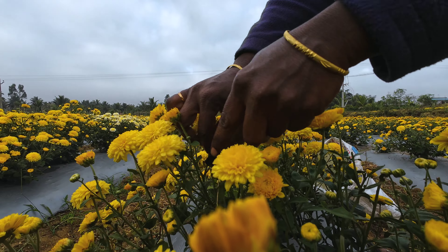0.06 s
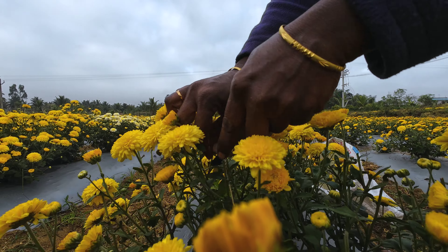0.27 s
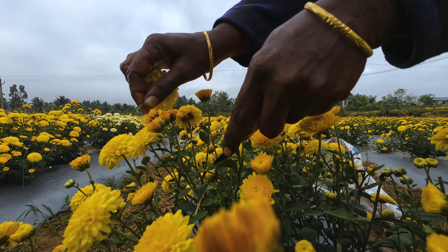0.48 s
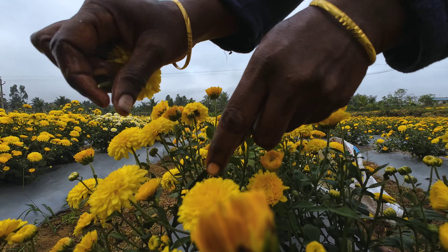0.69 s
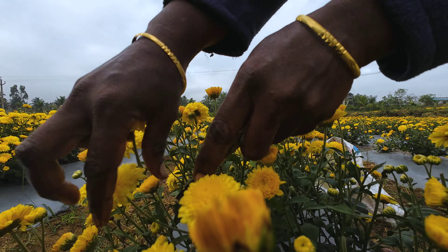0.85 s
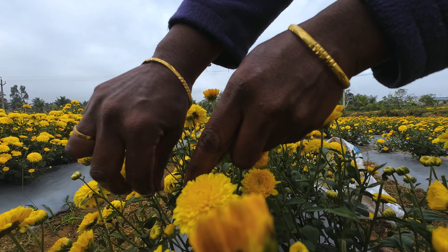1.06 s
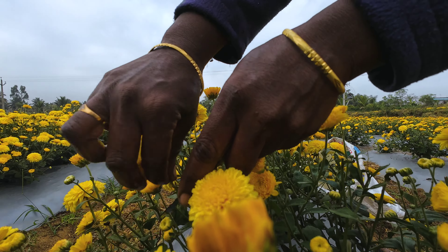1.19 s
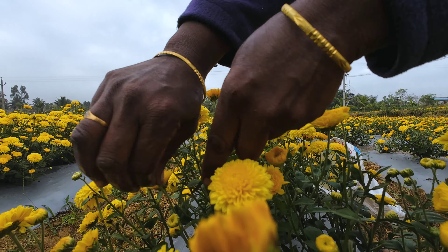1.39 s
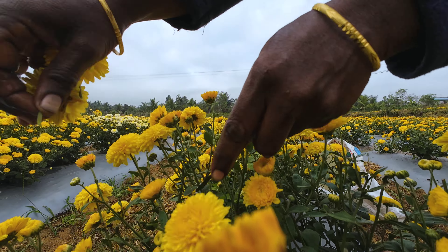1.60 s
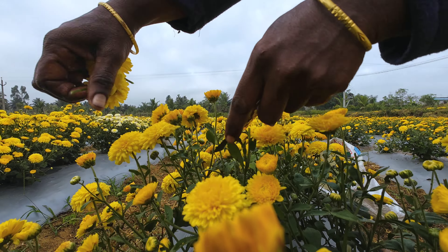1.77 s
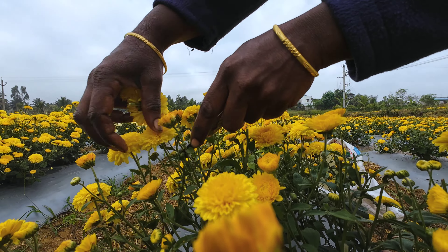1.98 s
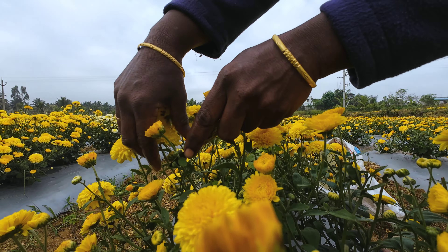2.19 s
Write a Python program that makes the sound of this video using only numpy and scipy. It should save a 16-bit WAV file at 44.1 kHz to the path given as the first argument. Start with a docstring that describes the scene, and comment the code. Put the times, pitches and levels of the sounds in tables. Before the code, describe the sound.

Two flower stems snap crisply about a second apart as hands pick them close to the microphone. Leaves rustle and tick between the snaps, over low wind rumble and a few faint bird chirps in an open field.

```python
"""Two flower heads are picked by hand, close to the microphone, in an open field.
Each stem creaks as it slips under the pull, snaps with a bright crack and a thump, and tears free.
Leaves fizz, tick and squeak against the fingers, petals brush the palm, bending stalks click,
and the jostled plant gives hollow knocks. A small bird whistles one chirp nearby and a few faint
ones sound far off, over a low wind rumble and the quiet hiss of open air."""
import sys
import numpy as np
from scipy import signal
from scipy.fft import rfft, irfft
from scipy.io import wavfile
from scipy.ndimage import uniform_filter1d

SR = 44100
rng = np.random.default_rng(int(sys.argv[2]) if len(sys.argv) > 2 else 0)


def int16_out(signal):
    """Quantize to a 16-bit WAV file."""
    q = np.round(np.clip(np.atleast_2d(signal).T, -1, 1) * 32767)
    wavfile.write(sys.argv[1], SR, q.astype(np.int16))


N = 99225

LEAF_PAN_DB = 0.5
# how alike close sounds are in left and right: freq_hz, correlation
CLOSE_IMAGE = [(60, 0.8), (500, 0.97), (2000, 1), (5000, 0.882), (9000, .6), (13000, 0.17)]


def picks():
    """Each stem slips in jerks, snaps with a thump, tears its last fibres, and the stalk sways."""
    # one row a flower: snap_s, crack_db, crack_s, thump_db, pull_s, pull_db, jerk_db,
    # tear_s, tear_db, pan_db, thump_hz
    flowers = [(0.4164, -23.5, 0.0027, -40, .0522, -47.5, 8, 0.036, -53, -1.5, 215),
               (1.5255, -21, 0.0013, -33.5, .034, -50, -0.5, .027, -48, 1.5, 374)]
    # ringing pitches of each snap, including the microphone's bright treble peaks:
    # pitch_hz, width_hz, level_db
    snap_pitches = [
        [(1335, 380, -3), (2835, 220, -5), (4440, 240, -6), (5790, 340, -1.5), (8570, 490, -4),
         (10170, 340, 2.5), (12110, 230, 6), (13100, 300, 6)],
        [(2545, 145, 1.5), (2894, 230, 5.5), (4220, 200, -10), (5360, 240, -7), (8570, 250, -6.5),
         (9330, 250, 0.5), (10050, 300, 4), (11800, 340, -2), (13080, 230, 6), (13030, 170, -1)],
    ]
    # tone of the stretched stem and of the tearing fibres: freq_hz, level_db
    pull_eq = [(60, 14), (180, 3), (450, -5), (850, 7.5), (1150, 3.5), (1600, -20), (2350, 2),
               (3500, -13.5), (5000, 0), (7000, -25), (10200, -9), (11500, -13), (13000, -13), (16000, -22)]
    tear_eq = [(80, -4), (250, 1), (700, -0.5), (1800, -9.5), (2800, -5.5), (5500, -1), (7000, -17),
               (10000, -4), (13000, -15), (16000, -40)]
    slips_per_s, thump_lead_s, sway_hz, sway_s = 145.34, 0.00106, 73.9, 0.015
    out, t = np.zeros((2, N)), np.arange(SR // 8) / SR
    sway = t / sway_s * np.exp(1 - t / sway_s) * np.sin(2 * np.pi * sway_hz * t)
    for flower, pitches in zip(flowers, snap_pitches):
        (snap_s, crack_db, crack_s, thump_db, pull_s, pull_db, jerk_db,
         tear_s, tear_db, pan_db, thump_hz) = flower
        pull = crackle(round(pull_s * SR), per_s=3700, spread_db=3, clump_db=-2, clump_hz=200, hiss=0.33)
        slips = np.cumsum(slips_per_s * (1 + 0.059 * drift(pull.shape[1], hz=81))) / SR
        creak = unit(pull * amp(jerk_db * np.sin(2 * np.pi * (slips - .15))))
        tear = crackle(round(tear_s * SR), per_s=3600, spread_db=4.5, clump_db=-1, clump_hz=197,
                       hiss=0.66)
        tear = patchy(tear, depth_db=2.5)
        add(out, snap_s - pull_s, amp(pull_db) * colour(fade(creak, .1), pull_eq), pan_db)
        add(out, snap_s, amp(tear_db) * colour(fade(tear, .1), tear_eq))
        add(out, snap_s, amp(crack_db) * snap(crack_s, pitches), pan_db)
        add(out, snap_s - thump_lead_s, amp(thump_db) * thump(t, thump_hz), pan_db)
        add(out, snap_s, amp(thump_db - 9) * sway)
    return out


def snap(length_s, pitches):
    """The fibres give way within milliseconds: a splintering crack with a brief, bright ring."""
    # tone of the splintering: freq_hz, level_db
    splinter_eq = [(150, 10), (500, -28), (1800, -19), (3000, 1.5), (7000, -24), (9500, -3), (13500, 8.5),
                   (16000, -6)]
    rise_s, fall_s, tail_s = 0.0006, 0.0001, 0.00357
    t = np.arange(2048) / SR
    after = np.maximum(t - length_s, 0)
    envelope = np.minimum(t / rise_s, 1) * (np.exp(-after / fall_s) + amp(-14) * np.exp(-after / tail_s))
    ring = 0
    for hz, width_hz, db in pitches:
        phase_gap = np.arccos(np.clip(curve_at(CLOSE_IMAGE, hz), -1, 1)) * rng.choice([-1, 1])
        # a wandering phase widens the tone into a narrow band
        wander = np.cumsum(rng.standard_normal(len(t))) * np.sqrt(.6 * np.pi * width_hz / SR)
        phase = 2 * np.pi * (hz * t + rng.random()) + wander + phase_gap * np.array([[.5], [-.5]])
        ring = ring + amp(db) * np.sqrt(width_hz) * np.sin(phase)
    splinters = colour(burst(envelope), splinter_eq)[:, :len(t)]
    return unit(ring) * envelope + amp(-9) * splinters


def thump(t, hz):
    """The released stem kicks the fingers: a low push and a brief dull ring."""
    push_s, ring_s = 0.00079, 0.0052
    push = (t / push_s - 2) * t / push_s * np.exp(1 - t / push_s)
    return push - amp(-6.5) * np.exp(-t / ring_s) * np.sin(2 * np.pi * hz * t)


def rustle():
    """Leaves and petals slide over the fingers: a bright fizz, fuller when pressed."""
    # level ride of the rustle, in four stretches: time_s, level_db
    ride = [
        [(0.0, -56), (0.03, -69), (0.1, -79), (0.136, -66.5), (0.172, -58.5), (0.218, -69), (0.226, -62.5),
         (0.28, -58), (0.318, -70.5), (0.386, -56), (0.41, -49)],
        [(0.425, -39.5), (0.47, -53), (0.535, -49), (0.655, -60.5), (0.667, -51), (0.691, -63), (0.699, -49),
         (0.789, -65.5), (0.893, -59), (0.909, -66.5), (0.931, -58.5), (0.945, -64.5), (1.0, -65.5)],
        [(1.0, -67), (1.022, -57.5), (1.064, -74.5), (1.076, -65), (1.096, -74), (1.14, -67), (1.185, -70.5),
         (1.262, -60.5), (1.296, -70.5), (1.392, -87), (1.402, -64), (1.422, -77), (1.454, -65), (1.482, -76),
         (1.49, -53)],
        [(1.55, -47), (1.558, -55.5), (1.646, -98), (1.7, -62), (1.746, -75.5), (1.798, -60.5), (1.846, -65),
         (1.926, -60), (2.0, -72), (2.012, -64), (2.036, -74), (2.058, -65), (2.094, -76), (2.144, -57.5),
         (2.25, -62.5)],
    ]
    # tone of the fine fizz and of the body that firm contact adds: freq_hz, level_db
    fizz_eq = [(200, -23.5), (900, -11), (2000, -13), (3600, -4), (4600, -2), (5700, -3.5), (7000, -6.5),
               (8200, -3), (9200, -3), (10200, 2), (11300, -1.5), (12400, 2.5), (13150, 5), (14200, -4),
               (16000, -19)]
    body_eq = [(150, -3), (350, -4), (1000, 1), (1900, -1.5), (3500, -1.5), (5000, -3.5), (8000, -0.5),
               (16000, -22)]
    firm_db, body_growth = -42.5, 1.155
    db = np.interp(np.arange(N) / SR, *np.concatenate(ride).T)
    grains = crackle(N, per_s=2100, spread_db=2, clump_db=2, clump_hz=114, hiss=0.6)
    fizz = colour(patchy(grains, depth_db=4) * amp(db), fizz_eq)
    friction = crackle(N, per_s=1500, spread_db=-0.5, clump_db=1.5, clump_hz=106, hiss=0.73)
    body_db = firm_db - 7.5 + body_growth * (db - firm_db)
    body = colour(friction * amp(body_db), body_eq)
    return (pan(fizz, LEAF_PAN_DB) + body)[:, :N]


def squeaks():
    """A waxy leaf rubs on skin with a thin, high rasp."""
    # leaf strokes: start_s, length_s, level_db
    strokes = [(1.126, 0.057, -58.5), (1.44, 0.046, -58.5), (1.485, 0.041, -59)]
    # tone of the rasp: freq_hz, level_db
    squeak_eq = [(3000, -42), (5300, -9), (5850, -11), (6500, -28), (9300, -26), (10050, 2), (11200, -24),
                 (12400, -13), (13100, 6), (14200, -9), (16000, -25)]
    return rubs(strokes, squeak_eq)


def petals():
    """Petals brush the palm with a soft hiss."""
    # petal strokes: start_s, length_s, level_db
    strokes = [(1.77, 0.067, -59), (1.865, .11, -59.5)]
    # tone of the hiss: freq_hz, level_db
    petal_eq = [(1500, -22), (4500, 0.5), (6500, -5), (9500, 3), (13000, -6), (16000, -24)]
    return rubs(strokes, petal_eq)


def rubs(strokes, eq):
    """Each stroke over the skin is a short swell of grainy friction."""
    out = np.zeros((2, N))
    for start_s, length_s, db in strokes:
        rub = crackle(round(length_s * SR), per_s=2000, spread_db=-3.5, clump_db=2, clump_hz=150,
                      hiss=0.36)
        add(out, start_s, amp(db) * colour(fade(rub, .5), eq), LEAF_PAN_DB)
    return out


def ticks():
    """Single leaves and stalks flick free: a sharp puff of noise with a faint tail."""
    # flicks: start_s, level_db, brightness_db, pan_db
    flicks = [(0.139, -50, 26, -4), (0.3874, -28.5, -14, -3.5), (0.4156, -33, -27, -16),
              (0.4373, -25.5, -7, 0), (0.446, -35, 8, -2.5), (0.5403, -31, -7, -1), (0.6387, -28, 24, 2),
              (1.074, -44, 11, 5), (1.1252, -41, 34, 2), (1.1385, -36.5, 37, 4), (1.1467, -40, 41, -1),
              (1.335, -48, -8, -1.5), (1.4953, -30.5, 31, 3), (1.542, -27, -2, -1), (1.5457, -29, 14, 2),
              (1.5496, -33, -11, 1), (1.672, -45, 5, 1), (1.687, -52, -18, 2), (1.696, -45.5, 26, 6),
              (1.7746, -45.5, -1, 5.5), (2.0104, -43, 33, 4), (2.162, -36, 5, 3)]
    # tone of a tick before its brightness tilt: freq_hz, level_db
    tick_eq = [(200, 2), (1000, -23.5), (1900, -3), (3400, -1.5), (5500, 7), (7000, -10.5), (10300, 5),
               (13200, 5), (16000, -8)]
    decay_s, tail_s, trim_db = 0.0014, 0.0042, -9.5
    out, t = np.zeros((2, N)), np.arange(SR // 40) / SR
    envelope = np.exp(-t / decay_s) + amp(-16) * np.exp(-t / tail_s)
    for start_s, db, bright_db, pan_db in flicks:
        tilted = [(hz, level + bright_db * np.clip(np.log2(hz / 5000), -1, 1) / 2)
                  for hz, level in tick_eq]
        add(out, start_s, amp(db + trim_db) * colour(burst(envelope), tilted), pan_db)
    return out


def clicks():
    """A bending stalk gives a short woody click."""
    # bends: start_s, level_db, pitch_ratio, decay_s
    bends = [(0.1768, -37, 1.3, 0.0012), (0.7672, -38, 0.89, 0.0032), (1.1044, -54, 0.51, 0.003),
             (1.522, -29.5, 1.4, 0.0014), (1.538, -32, 0.75, 0.0009), (1.637, -47.5, 0.89, 0.00062)]
    # tone of a stalk's click: freq_hz, level_db
    stalk_eq = [(300, -27), (1200, -10.5), (1800, -7), (2250, -2), (2950, -5.5), (3500, 2.5), (4000, 1),
                (5500, -6), (7000, -19), (16000, -29)]
    trim_db = -7
    out, t = np.zeros((2, N)), np.arange(SR // 30) / SR
    for start_s, db, ratio, decay_s in bends:
        shifted = [(hz * ratio, level) for hz, level in stalk_eq]
        add(out, start_s, amp(db + trim_db) * colour(burst(np.exp(-t / decay_s)), shifted))
    return out


def knocks():
    """The jostled plant gives soft hollow knocks, each with a dull tap and a trailing scuff."""
    # hits: start_s, level_db, tilt_db_per_octave
    hits = [(0.523, -38.5, 1), (0.553, -38, 4), (0.5725, -32.5, -1), (0.583, -44.5, -8),
            (0.6175, -42.5, 11), (0.633, -38, 7.5), (0.679, -41, 9), (0.695, -39.5, -9), (0.709, -44, -9),
            (1.133, -48, 6), (1.829, -48.5, -3)]
    # modes of the hollow ring: pitch_hz, level_db, t60_s
    modes = [(333, -12.5, 0.15), (459, -5.5, 0.12), (628, -1, 0.12), (726.5, 3.5, 0.086), (864, -1.5, 0.1),
             (1117, -4.5, 0.13), (1270, 0, 0.045), (1388, -3.5, 0.077), (2420, -15.5, 0.068)]
    # tone of the tap and scuff: freq_hz, level_db
    scuff_eq = [(150, -22), (400, 2.5), (800, 2.5), (1400, -2), (2100, -10.5), (3700, -4), (6000, -21.5),
                (16000, -37)]
    pivot_hz, ring_db, attack_s, tap_s, scuff_s = 800, -15.5, 0.0004, 0.002, 0.032
    out, t = np.zeros((2, N)), np.arange(SR // 5) / SR
    contact = amp(-8.5) * np.exp(-t / tap_s) + amp(-14.5) * np.exp(-t / scuff_s)
    for start_s, db, tilt in hits:
        ring = 0
        for hz, mode_db, t60_s in modes:
            decay = amp(mode_db + tilt * np.log2(hz / pivot_hz) - 60 * t / t60_s)
            ring = ring + decay * np.sin(2 * np.pi * (hz * t + rng.random()))
        add(out, start_s, amp(db + ring_db) * ring * np.minimum(t / attack_s, 1))
        add(out, start_s, amp(db) * colour(burst(contact), scuff_eq))
    return out


def birds():
    """One arched chirp nearby and a few faint, fluttering ones far off."""
    # contour of the near chirp: time_s, pitch_hz, level_db
    chirp = [(0.292, 3190, -71), (0.303, 3630, -56.5), (0.313, 3716, -53.5), (0.325, 3715, -47),
             (0.338, 3630, -54.5), (0.351, 3586, -45), (0.364, 3540, -56), (0.378, 3400, -55),
             (0.407, 3490, -61)]
    # distant calls: start_s, length_s, start_hz, end_hz, level_db
    far_calls = [(0.834, 0.047, 3720, 3060, -67.5), (1.804, 0.098, 3610, 3650, -68.5),
                 (2.055, 0.036, 3220, 3140, -75.5)]
    out = np.zeros((2, N))
    add(out, chirp[0][0], whistle(chirp))
    for start_s, length_s, start_hz, end_hz, db in far_calls:
        note = whistle([(start_s, start_hz, db), (start_s + length_s, end_hz, db)])
        flutter = unit(1 + drift(len(note), hz=250))
        add(out, start_s, fade(note, .5) * flutter)
    return out


def whistle(contour):
    """A bird's pure gliding note."""
    times, hz, db = np.transpose(contour)
    t = np.arange(times[0], times[-1], 1 / SR)
    phase = 2 * np.pi * np.cumsum(np.interp(t, times, hz)) / SR
    return np.sqrt(2) * amp(np.interp(t, times, db)) * np.sin(phase)


def field():
    """Light wind rumbles on the microphone under the hiss of open air."""
    # swell of the wind: time_s, gain_db
    gusts = [(0, -1.5), (0.12, -4), (0.22, 3.5), (0.4, 0.5), (0.87, 3), (1.03, -1), (1.17, 2), (1.85, 0.5),
             (2.0, -1)]
    # tone of the wind and of still air: freq_hz, level_db
    wind_eq = [(10, -3), (25, 4), (38, -4), (52, 4), (66, -7), (88, -4), (125, -18.5), (200, -30.5),
               (400, -35.5), (1000, -51.5)]
    air_eq = [(100, 12.5), (300, 3), (500, 0.5), (1000, -5), (2000, -8), (3300, -10.5), (4900, -11),
              (7000, -20), (9000, -34), (10100, -30), (11500, -13.5), (13100, -6), (14300, -18),
              (16000, -21)]
    gust_db = np.interp(np.arange(N) / SR, *np.transpose(gusts))
    return amp(-52 + gust_db) * noise_bed(wind_eq) + amp(-67) * noise_bed(air_eq)


def noise_bed(eq):
    """Steady outdoor noise, wide in the treble, rms 1."""
    # how alike the ambience is in left and right: freq_hz, correlation
    field_image = [(25, 0.4), (100, 0.93), (600, 0.55), (3000, 0.45), (7000, 0.041), (14000, 0)]
    noise = stereo(rng.standard_normal((2, N)), field_image)
    return unit(irfft(rfft(noise) * amp(curve_at(eq, np.fft.rfftfreq(N, 1 / SR))), N))


def crackle(count, per_s, spread_db, clump_db, clump_hz, hiss):
    """Clumped tiny fractures of uneven size over a little smooth friction."""
    sizes = amp(spread_db * np.minimum(rng.exponential(1, N), 3))
    fractures = sizes * (rng.random(N) < per_s / SR)
    grains = (unit(fractures) + hiss) * rng.standard_normal((2, N))
    clumps = amp(clump_db * drift(count, clump_hz))
    return unit(stereo(grains[:, :count] * clumps, CLOSE_IMAGE))


def patchy(x, depth_db, size=256):
    """Each brief contact favours its own pitches."""
    frames = signal.stft(x, nperseg=size)[2]
    patches = uniform_filter1d(rng.standard_normal(frames.shape[1:]), size=4, axis=0)
    patches = unit(uniform_filter1d(patches, size=5, axis=1))
    return unit(signal.istft(frames * amp(depth_db * patches), nperseg=size)[1][:, :x.shape[1]])


def burst(envelope):
    """A short puff of noise with the energy of its envelope."""
    puff = stereo(rng.standard_normal((2, len(envelope))) * envelope, CLOSE_IMAGE)
    return unit(puff) * np.sqrt(np.mean(envelope ** 2))


def drift(count, hz):
    """A smooth random wobble, rolling off above hz."""
    lowpass = np.exp(-(np.fft.rfftfreq(N, 1 / SR) / hz) ** 2)
    return unit(irfft(rfft(rng.standard_normal(N)) * lowpass, N))[:count]


def colour(x, eq, size=4096):
    """Minimum-phase EQ of unit energy."""
    log_gain = np.log(amp(curve_at(eq, abs(np.fft.fftfreq(size, 1 / SR)))))
    taps = np.fft.ifft(np.exp(np.conj(signal.hilbert(log_gain)))).real[:size // 2]
    return signal.fftconvolve(x, taps[None] / np.linalg.norm(taps), axes=1)


def stereo(pair, image):
    """Blends two unrelated signals as mid and side to the given left-right correlation."""
    count = pair.shape[1]
    alike = np.clip(curve_at(image, np.fft.rfftfreq(count, 1 / SR)), -1, 1)
    mid, side = rfft(pair) * np.sqrt([(1 + alike) / 2, (1 - alike) / 2])
    return irfft([mid + side, mid - side], count)


def curve_at(points, hz):
    """Reads a curve on a log-frequency axis."""
    freqs, values = np.transpose(points)
    return np.interp(np.log(hz + 1), np.log(freqs + 1), values)


def add(mix, start_s, sound, pan_db=0):
    """Mixes a sound in at a time and a place."""
    part = mix[:, max(round(start_s * SR), 0):][:, :sound.shape[-1]]
    part += pan(sound, pan_db)[:, :part.shape[1]]


def pan(x, db):
    """Sets the left channel db above the right."""
    return x * amp([[db / 2], [-db / 2]])


def fade(x, share):
    """Fades in and out; the two fades together take this share of the length."""
    return x * signal.windows.tukey(x.shape[-1], share)


def amp(db):
    """Decibels to gain."""
    return 10 ** (np.asarray(db) / 20)


def unit(x):
    """Scales to rms 1."""
    return x / np.sqrt(np.mean(x ** 2) + 1e-20)


def scene():
    """The hands at work up close, the birds and the field behind."""
    return picks() + rustle() + squeaks() + petals() + ticks() + clicks() + knocks() + birds() + field()


def record(dry):
    """The recorder's band limit: a steep low-pass at 16.2 kHz."""
    lowpass = signal.firwin(255, 16200, window=("kaiser", 9), fs=SR)
    return signal.oaconvolve(dry, lowpass[None], "same")


dry = scene()
out = record(dry)
int16_out(out)
```